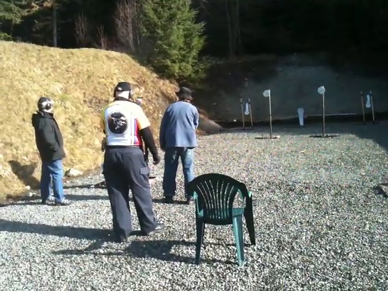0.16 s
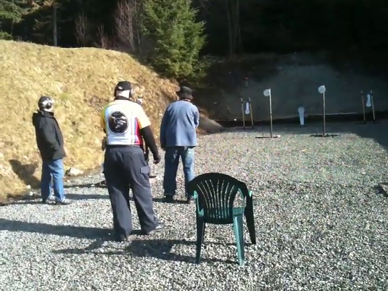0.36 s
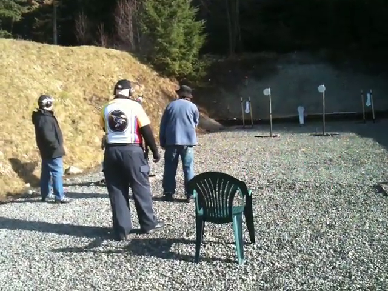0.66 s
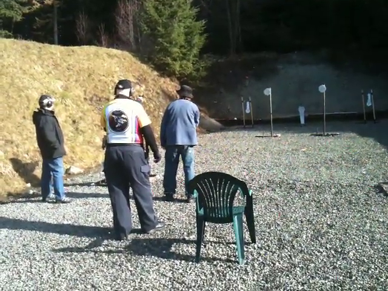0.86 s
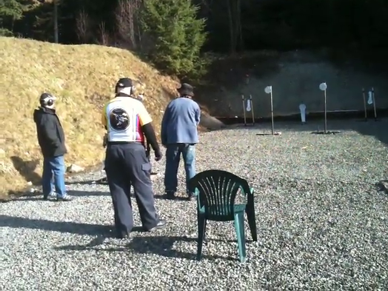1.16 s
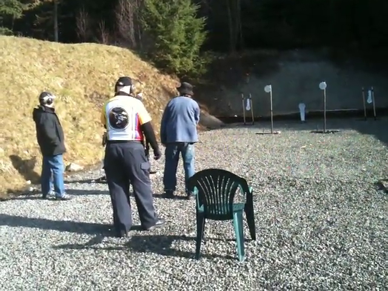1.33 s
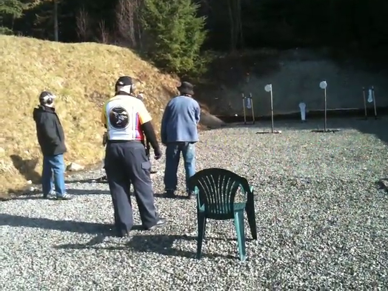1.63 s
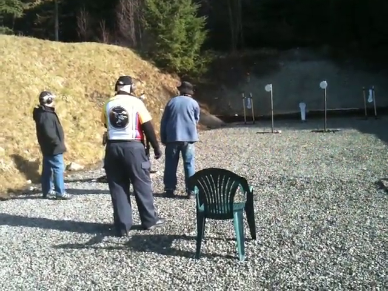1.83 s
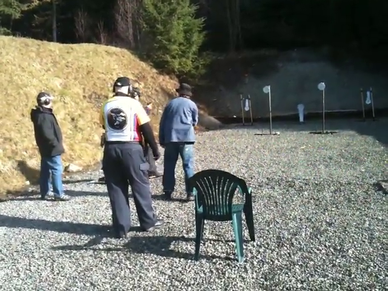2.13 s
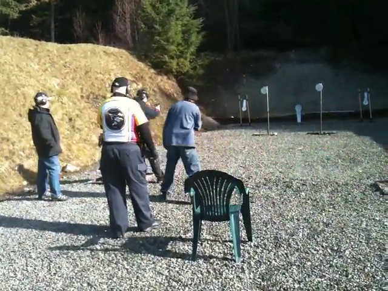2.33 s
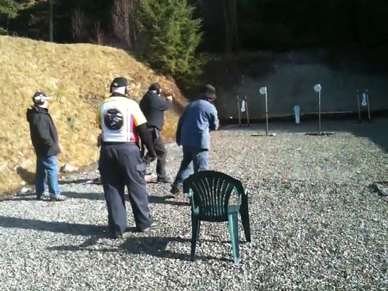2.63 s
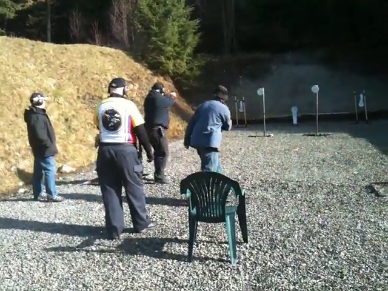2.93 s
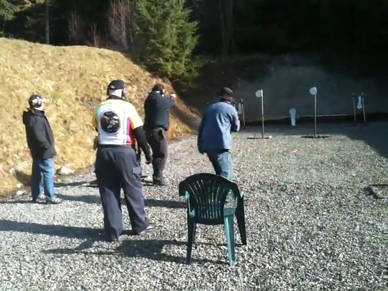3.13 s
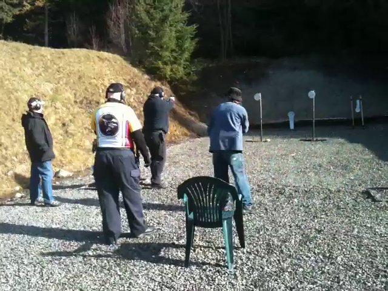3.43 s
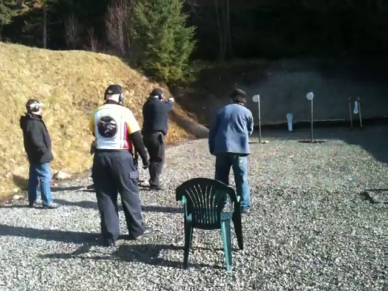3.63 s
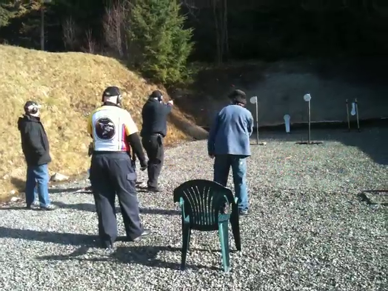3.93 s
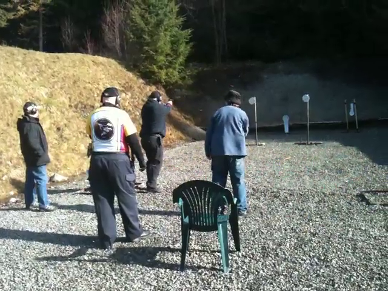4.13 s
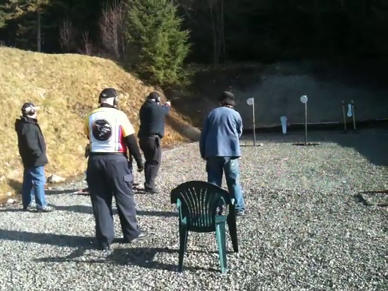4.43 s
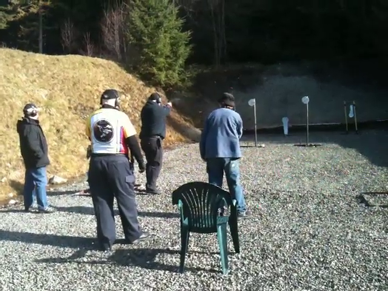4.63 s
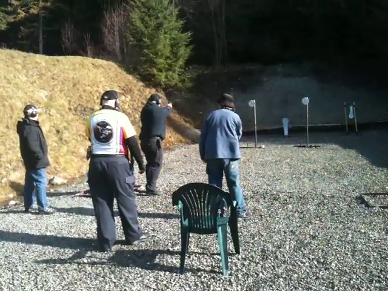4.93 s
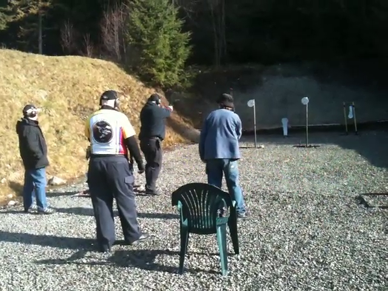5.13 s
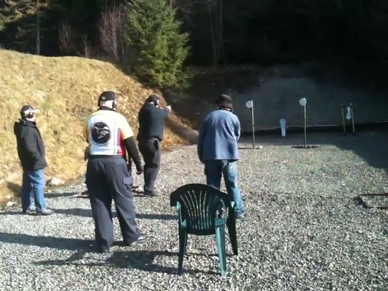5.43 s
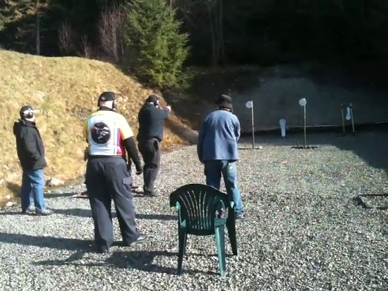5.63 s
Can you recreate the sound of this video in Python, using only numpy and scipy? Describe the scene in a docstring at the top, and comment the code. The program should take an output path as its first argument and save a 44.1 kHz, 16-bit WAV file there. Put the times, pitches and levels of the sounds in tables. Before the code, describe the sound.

Outdoors between earth banks and forest, a shot's tail is cut by a close pistol blast that overloads the microphone. Hollower shots boom from the next bay, ringing small steel plates. Near shots return at intervals, two hitting plates with bright clangs. Between the later blasts, gravel clicks underfoot and empty cases tinkle on stones.

```python
"""The dying tail of a pistol shot, then at once a near shot that overloads the microphone, outdoors between
earth banks and forest. A pistol in the next bay booms over the bank, a third sounds once further off.
Shots are shaped noise tails, damped-sine booms and noise-burst cracks. Bullets ring six steel plates, two of
them near: damped sines and scattered noise. Gravel clicks underfoot; spent cases tick and ring on stones."""
import sys
import numpy as np
from scipy import signal
from scipy.fft import rfft, irfft, next_fast_len
from scipy.io import wavfile
from scipy.ndimage import uniform_filter1d

SR = 44100
rng = np.random.default_rng(int(sys.argv[2]) if len(sys.argv) > 2 else 0)


def ratio(d):
    """dB to gain"""
    e = np.asarray(d, float) / 20
    return 10 ** e


def store_pcm(level_fs):
    """Save levels as 16-bit WAV."""
    pcm = np.round(np.clip(level_fs, -1, 1) * 32767).astype(np.int16)
    wavfile.write(sys.argv[1], SR, np.atleast_2d(pcm).T)


N = 254898
TAIL_N = int(1.3 * SR)
TIME_S = np.arange(TAIL_N) / SR


def add(out, sound, start_s):
    """Mix a sound in from start_s, cropped to the scene; a negative start leaves only its later part."""
    i = int(round(start_s * SR))
    part = sound[max(-i, 0):N - i]
    out[max(i, 0):max(i, 0) + len(part)] += part


# Colour of scattered sound, relative: freq_hz [Hz], density_db [dB per Hz]
SCATTER_COLOUR = [(59, -52.5), (100, -23.5), (289, -7), (452, -7.5), (752, -2.5), (1250, -7.5), (1520, -9),
                  (2320, -9), (2630, -14), (7610, -17.5), (16000, -47.5)]
BAND_HZ = 100 * 2 ** (np.arange(16) / 2)
PATCHY_DB, PATCH_S = 0.9, 0.006  # rms level swing, smoothing window


def bands():
    """Half-octave bands of coloured noise, total rms near 1; trunks and stones return sound unevenly."""
    size = next_fast_len(N + TAIL_N)
    hz = np.fft.rfftfreq(size, 1 / SR)[1:]
    freq_hz, density_db = np.array(SCATTER_COLOUR).T
    colour = ratio(np.interp(np.log(hz), np.log(freq_hz), density_db))
    spectrum = rfft(rng.standard_normal(size))[1:] * colour / np.sqrt(np.mean(colour ** 2))

    patch_n = int(PATCH_S * SR)
    swing = uniform_filter1d(uniform_filter1d(rng.standard_normal(size), patch_n), patch_n)
    patches = ratio(PATCHY_DB * swing / swing.std())
    patches = patches / np.sqrt(np.mean(patches ** 2))

    split = []
    for centre_hz in BAND_HZ:
        window = np.clip(1 - 2 * abs(np.log2(hz / centre_hz)), 0, 1)  # triangle, half an octave each side
        split.append(irfft(np.r_[0, spectrum * window], size))
    return patches * np.array(split)


def forest_quiet(noise):
    """Steady quiet of the forest: the sum of all noise bands."""
    quiet_db = -65.5
    return ratio(quiet_db) * noise.sum(axis=0)[:N]


AIR_10KHZ_DB_PER_S = 55


def scatter(returns, noise):
    """Maker of tails of countless small reflections; air takes the treble as the paths grow longer."""
    treble = np.clip(np.log(BAND_HZ / 500) / np.log(5.0), 0, 1)[:, None]  # 0 at 500 Hz, 1 at 2500 Hz
    power = 0
    for lag_s, bass_db, treble_db, swell60_s, t60_s in returns:
        level = ratio((1 - treble) * bass_db + treble * treble_db)
        decades = np.maximum((lag_s - TIME_S) / swell60_s, (TIME_S - lag_s) / t60_s)
        power = power + level ** 2 * 1000 ** (-2 * decades)
    air_db = AIR_10KHZ_DB_PER_S * (BAND_HZ[:, None] / 10000) ** 1.52 * (0.25 - TIME_S)  # 0 dB at 0.25 s
    gain = np.sqrt(power) * ratio(air_db)

    def tail():
        """One tail: the band gains on a random stretch of the noise."""
        start = int(rng.random() * N)
        return np.einsum("ij,ij->j", gain, noise[:, start:start + TAIL_N])

    return tail


def ring(modes):
    """Damped sines set off by one blow."""
    return sum(ratio(level_db) * np.sin(2 * np.pi * pitch_hz * TIME_S) * 1000 ** (-TIME_S / t60_s)
               for pitch_hz, level_db, t60_s in modes)


def tick(low_hz, top_hz, t60_s):
    """Decaying noise burst through a gentle band-pass."""
    n = SR // 10
    burst = rng.standard_normal(n) * 1000 ** (-TIME_S[:n] / t60_s)
    return signal.sosfilt(signal.butter(1, [low_hz, top_hz], "band", fs=SR, output="sos"), burst)


# Shots by firing point: start_s [s], level_db [dB]
SHOTS = {"near": [(.0304, -1.5), (1.4037, -2.5), (3.6061, -1), (4.7378, -2.5)], "next bay": [(-.33, 1),
         (.6318, -0.3), (1.0511, 0), (1.7744, 0.2), (2.1261, 0), (2.5185, -0.3), (2.8764, -0.3)],
         "far bay": [(0.5362, -.1)]}
# Early returns and long forest tail, rows in any order, by firing point, and "plate" for bullet impacts:
# lag_s [s, peak], bass_db [dB], treble_db [dB], swell60_s [s per 60 dB rise], t60_s [s per 60 dB fall]
SURFACE_RETURNS = {"near": [(.001, 7, 5, 0.1, 0.2522), (.033, 4, -2.5, 0.1, .13),
                   (.085, -3.5, -16, 0.4, 0.16), (.15, -10.5, -16, 0.75, 0.29),
                   (.28, -34.5, -25, 0.6, 0.84), (.22, -24, -28.5, .5, 1.91)],
                   "next bay": [(.012, -11, -25, 1, 0.24), (.044, -7, -23, .075, .08),
                   (.106, -16, -16.5, 0.08, 0.1), (.126, -17, -11, .1, .19), (.2, -37.5, -20, .5, 1.3),
                   (.2, -26, -29, 0.7, 1.87)], "far bay": [(0.054, -23.5, -22.5, 0.02, 2.5),
                   (.02, -25.5, -47, 0.5, 0.7)], "plate": [(.001, -1.5, -.5, .002, 0.06),
                   (.02, -8.5, -8.5, 0.2, 0.28), (.07, -10, -7.5, 0.1, 0.14), (.15, -21.5, -18, 1.5, 1.5)]}
# Hollow boom bent over or thrown back by the banks, by firing point:
# arrivals: lag_s [s], level_db [dB]; modes: pitch_hz [Hz], level_db [dB], t60_s [s]
BANK_BOOMS = {"near": ([(.082, -2)], [(311, 1, .11), (235, -2, 0.095)]), "next bay": ([(0, -0.3),
              (.047, -14), (.09, -22)], [(314, 4, 0.041), (528, -14.5, .07), (649, -9.5, 0.067),
              (796, -12.5, 0.06), (898, -13, 0.088), (1273, -12, 0.044)]), "far bay": ([(0.00073, -.1)],
              [(309, -11, 0.044), (550, -4.5, .015), (997, -14, 0.012)])}
# Sharp cracks off hard faces, by firing point: lag_s [s], level_db [dB]
HARD_FACE_CRACKS = {"near": [(0.081, -.1)], "far bay": [(.0004, -13)], "next bay": [(.0008, -1.5),
                    (0.0202, -16), (0.0233, -16.5), (0.0377, -2.5), (.041, -8.5), (0.0701, -9.5)]}
# Scatter repeated shot to shot, by firing point: share [amplitude, 0..1]
SCATTER_ALIKE = {"near": .05, "next bay": 0.29, "far bay": .05}


def pistol(out, place, noise):
    """The same paths carry each shot: boom and cracks repeat, the scatter only in part as the aim swings."""
    tail = scatter(SURFACE_RETURNS[place], noise)
    alike = SCATTER_ALIKE[place]
    arrivals, modes = BANK_BOOMS[place]
    common_tail = tail()
    boom = -ring(modes)
    for start_s, shot_db in SHOTS[place]:
        shot_tail = alike * common_tail + np.sqrt(1 - alike ** 2) * tail()
        add(out, ratio(shot_db) * shot_tail, start_s)
        for lag_s, boom_db in arrivals:
            add(out, ratio(shot_db + boom_db) * boom, start_s + lag_s)
        for lag_s, crack_db in HARD_FACE_CRACKS[place]:
            crack = tick(low_hz=1500, top_hz=7100, t60_s=0.007)
            add(out, ratio(shot_db + crack_db) * crack, start_s + lag_s)


# Steel plates, small and large near ones, then four in the next bay: pitch_hz [Hz], level_db [dB], t60_s [s]
PLATE_MODES = [
    [(4001, -7, 0.7), (4002.6, -13, 0.65), (4527.5, -11, 1.48), (4563, -15.5, 1.4), (6368, -19, .4),
     (7357, 18, 0.18), (8759, -22.5, 0.4), (9577, -26, .9), (10720, -14, .2), (10940, -18, 0.74),
     (10942.5, -21.5, 0.77), (13100, -29.5, .4), (14400, -31, .6), (15550, -28, .7)],
    [(1147, -13.5, 0.45), (1835, -19.5, 0.34), (2470, -18.5, 0.35), (4237, -20, 0.3), (5264, -7, 0.45),
     (5453, -20, 0.5), (7200, -5, 0.1), (7241, -12.5, 0.34), (7838, -5, 0.27), (10900, -21, .3),
     (12330, -27.5, .28), (12700, -27.5, .3), (14500, -27.5, .15)],
    [(4500, -19, 0.091), (6460, -34.5, 1.2)],
    [(2805, -28, 0.3), (3700, -21, .2), (4511, -28, .3), (6298, -32, 2.4)],
    [(2810, -27, 0.23), (3580, -25.5, 0.7), (4280, -22, 0.3), (5873, -32, .8), (8511, -34, 0.88)],
    [(3526, -30, 1.6), (5405, -29.5, .8), (5889, -34.5, 2.3), (7500, -28, .1)],
]
# One hit per plate, same order: start_s [s], smack_db [dB], returned_clang_db [dB], weak_swell_s [s]
PLATE_HITS = [(4.789, -7.5, -63, 0.03), (1.487, -2, -43.5, .015), (.663, -17.5, -41.5, .002),
              (1.09, -18.5, -39.5, .002), (1.838, -13.5, -38, .002), (2.166, -17.5, -37, .002)]


def steel_plates(out, noise):
    """A bullet bursts on steel; the loudest mode sounds at once, others swell in; banks and trees return it."""
    tail = scatter(SURFACE_RETURNS["plate"], noise)
    for modes, (start_s, smack_db, returned_clang_db, weak_swell_s) in zip(PLATE_MODES, PLATE_HITS):
        *weak, loudest = sorted(modes, key=lambda mode: mode[1])
        swell = 1 - np.exp(-(TIME_S / weak_swell_s) ** 2)
        clang = ring([loudest]) + ring(weak) * swell
        smack = ratio(smack_db) * tail()
        returned = ratio(returned_clang_db) * signal.fftconvolve(clang, tail())[:TAIL_N]
        add(out, clang + smack + returned, start_s)


# Shifting foot: start_s [s], level_db [dB, loudest click], spread_s [s]
FOOT_SHIFTS = [(3.36, -61, .09), (3.485, -30.5, .045), (3.545, -43, .05), (5.32, -69, 0.027),
               (5.55, -62, .02)]


def gravel(out):
    """Under a shifting foot many stones click within a few hundredths of a second."""
    for start_s, level_db, spread_s in FOOT_SHIFTS:
        for delay, softness in rng.random((40, 2)):
            click = tick(low_hz=5000, top_hz=13000, t60_s=0.004)
            add(out, ratio(level_db - 12 * softness) * click, start_s + spread_s * delay)


# Brass cases landing on stones: start_s [s], ring_db [dB], tick_db [dB]
CASE_DROPS = [(4.41, -47, -36.5), (4.503, -60, -54), (4.549, -57.5, -43.5), (4.647, -52.5, -53.5),
              (4.677, -60, -52.5), (5.772, -47, -35.5)]
# Modes of a case: pitch_hz [Hz], level_db [dB], t60_s [s]
CASE_MODES = [(8200, 4, .25), (8100, -2.5, .2), (9400, -12, 0.09), (12000, -15.5, .08), (13930, -10, .15)]


def spent_cases(out):
    """Thin brass tubes tick on the stones and ring faintly."""
    for start_s, ring_db, tick_db in CASE_DROPS:
        add(out, ratio(ring_db) * ring(CASE_MODES), start_s)
        add(out, ratio(tick_db) * tick(low_hz=3970, top_hz=12000, t60_s=0.015), start_s)


def scene():
    """Shots, plates, steps and cases over the quiet of the forest, one channel."""
    noise = bands()
    out = forest_quiet(noise)
    for place in SHOTS:
        pistol(out, place, noise)
    steel_plates(out, noise)
    gravel(out)
    spent_cases(out)
    return out[None]


def roll_off(x):
    """The treble ends steeply here."""
    return signal.sosfilt(signal.butter(12, 16830, fs=SR, output="sos"), x)


CAPSULE_HZ, STAGE_LOW_HZ, STAGE_TOP_HZ, TOP_HZ = 158, 70, 11000, 15900
CLIP_LEVEL = 0.67  # overload scale at the input stage
HISS_DB = -76  # rms before the top filter


def record(dry):
    """The capsule drops the bass; the input stage flattens peaks, rounds off both ends and hisses."""
    capsule = signal.sosfilt(signal.butter(2, CAPSULE_HZ, "high", fs=SR, output="sos"), dry)
    drive = capsule / CLIP_LEVEL
    clipped = CLIP_LEVEL * drive / (1 + abs(drive) ** 6.45) ** (1 / 5.7)
    stage = signal.butter(1, [STAGE_LOW_HZ, STAGE_TOP_HZ], "band", fs=SR, output="sos")
    rounded = signal.sosfilt(stage, clipped)
    hissing = rounded + ratio(HISS_DB) * rng.standard_normal(rounded.shape)
    mix = signal.sosfilt(signal.cheby1(8, 0.1, TOP_HZ, fs=SR, output="sos"), hissing)
    return roll_off(mix)


dry = scene()
out = record(dry)
store_pcm(out)
```